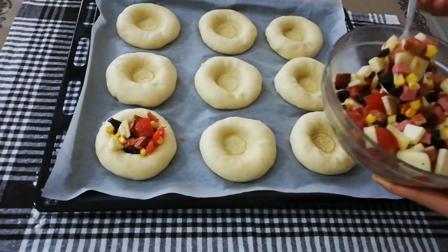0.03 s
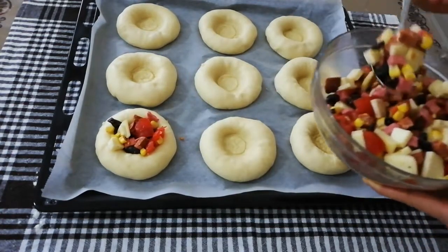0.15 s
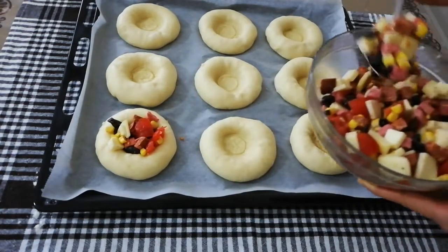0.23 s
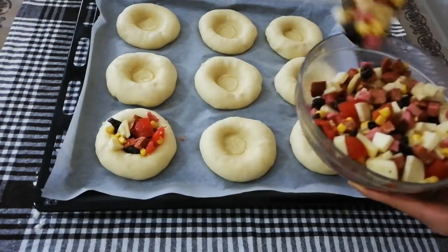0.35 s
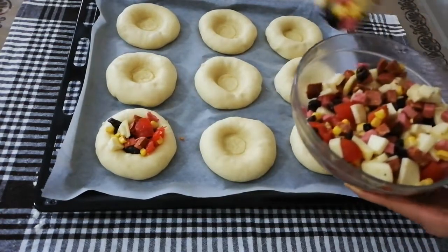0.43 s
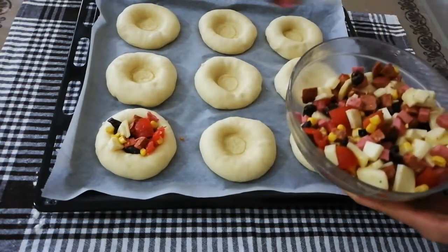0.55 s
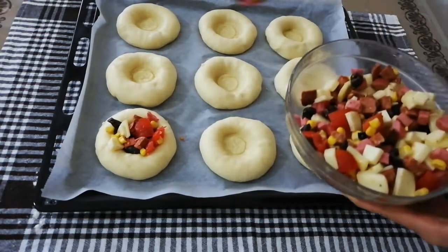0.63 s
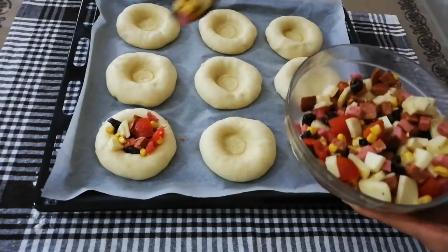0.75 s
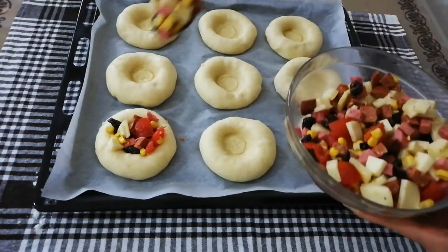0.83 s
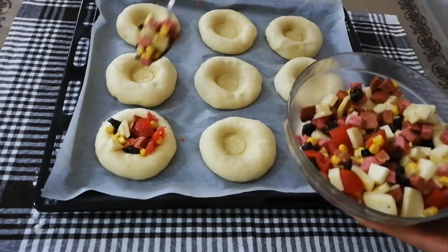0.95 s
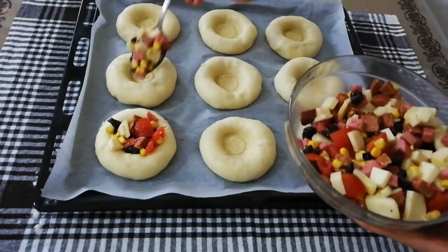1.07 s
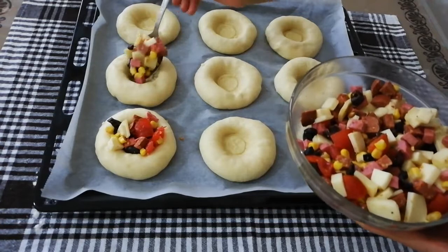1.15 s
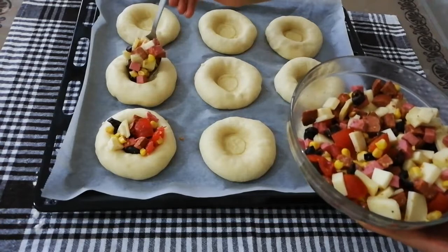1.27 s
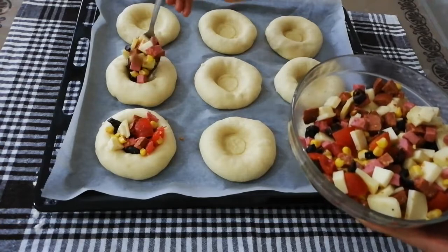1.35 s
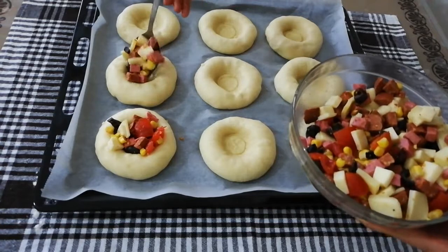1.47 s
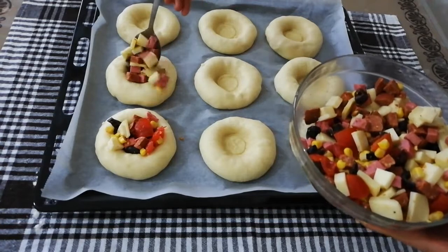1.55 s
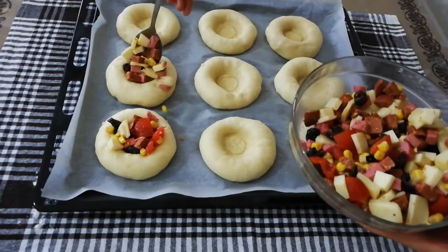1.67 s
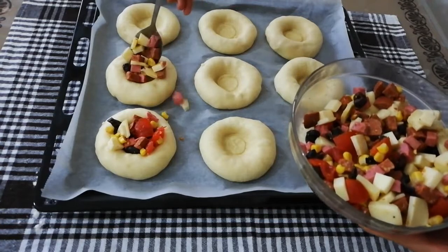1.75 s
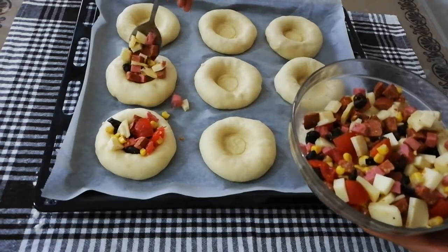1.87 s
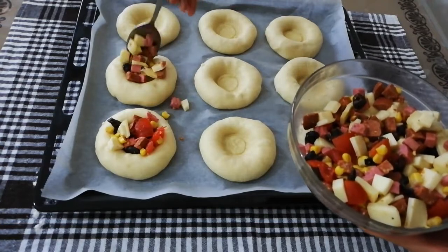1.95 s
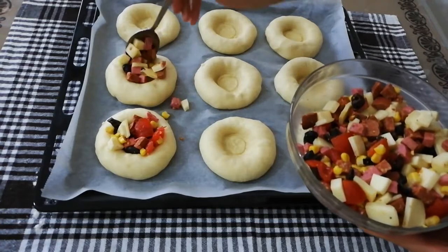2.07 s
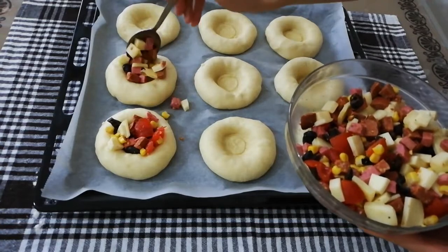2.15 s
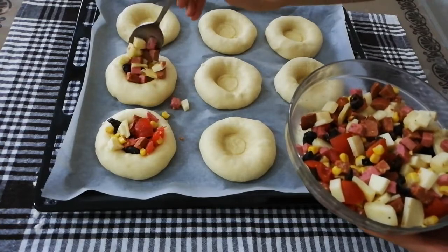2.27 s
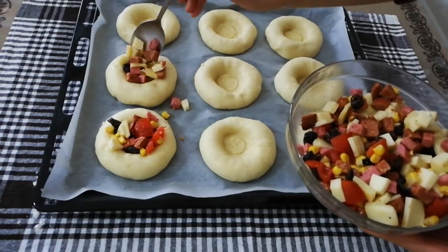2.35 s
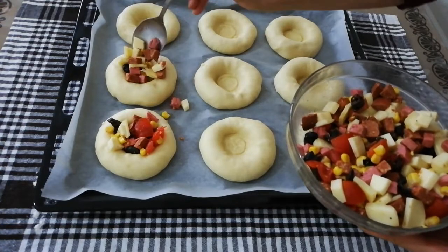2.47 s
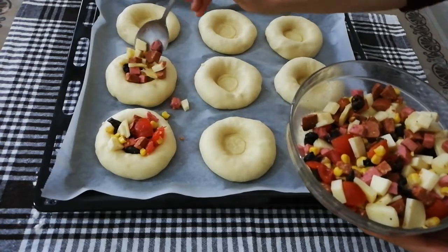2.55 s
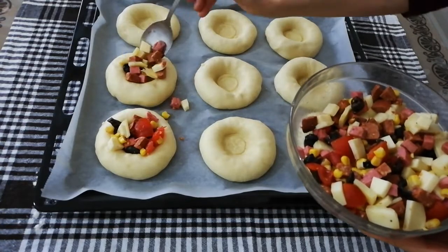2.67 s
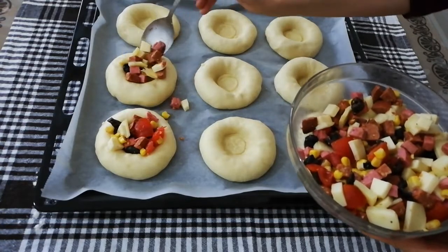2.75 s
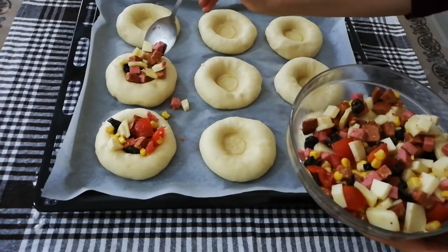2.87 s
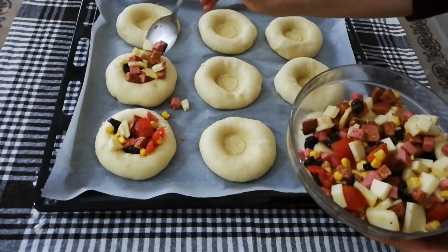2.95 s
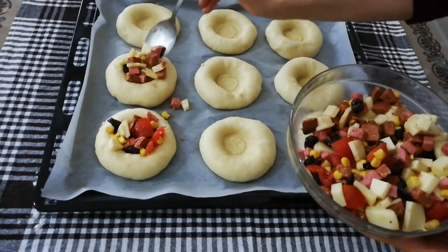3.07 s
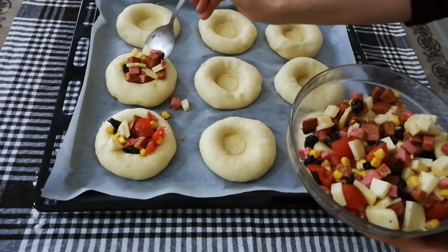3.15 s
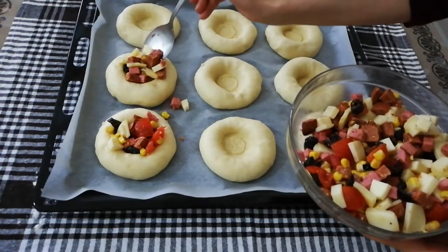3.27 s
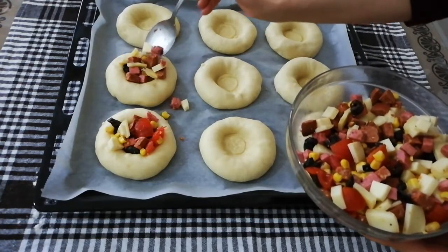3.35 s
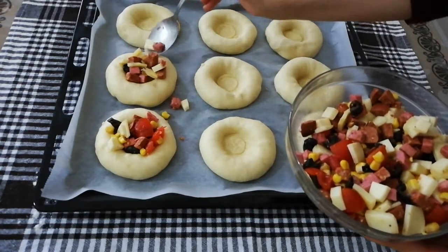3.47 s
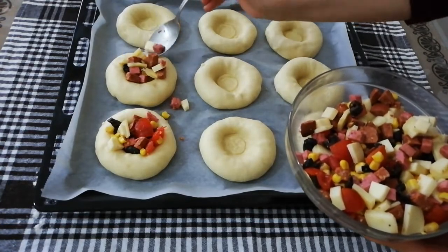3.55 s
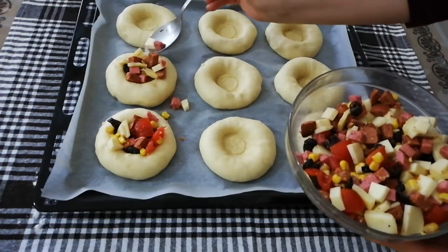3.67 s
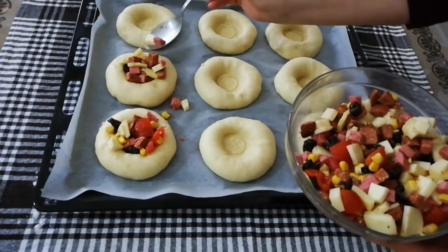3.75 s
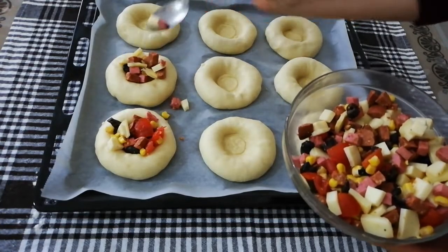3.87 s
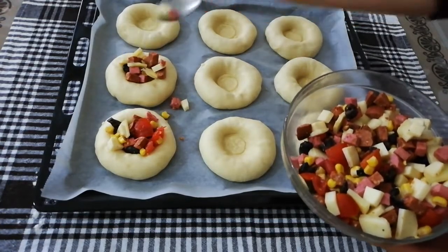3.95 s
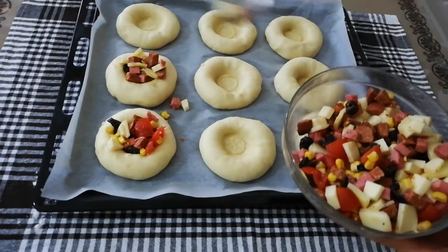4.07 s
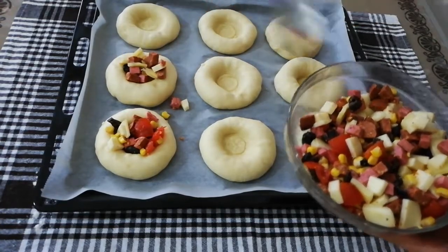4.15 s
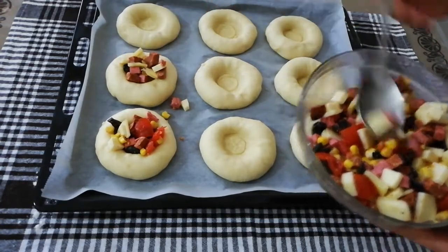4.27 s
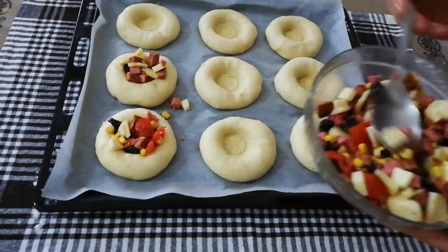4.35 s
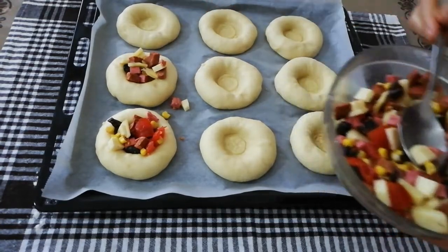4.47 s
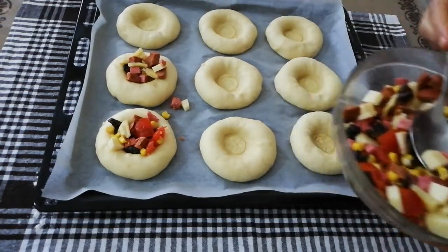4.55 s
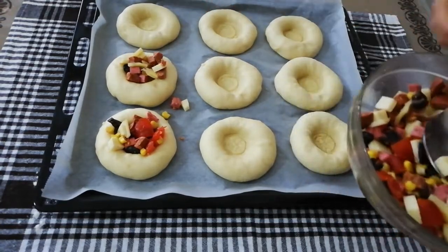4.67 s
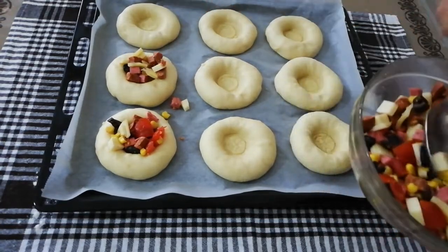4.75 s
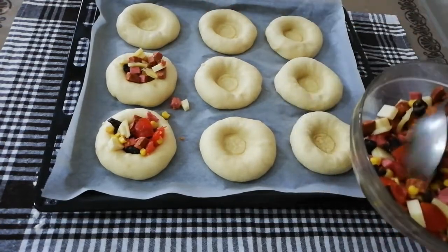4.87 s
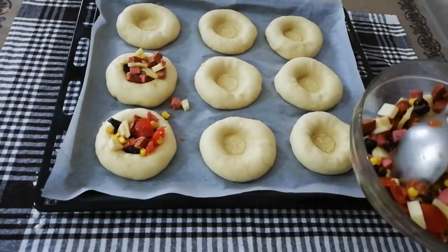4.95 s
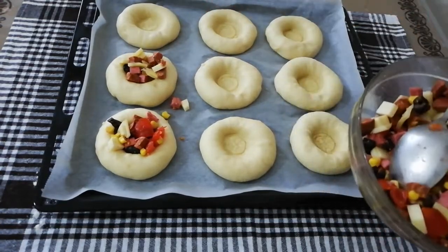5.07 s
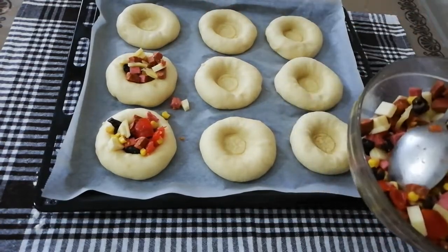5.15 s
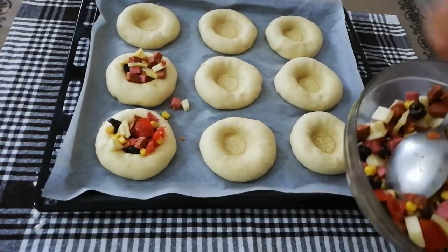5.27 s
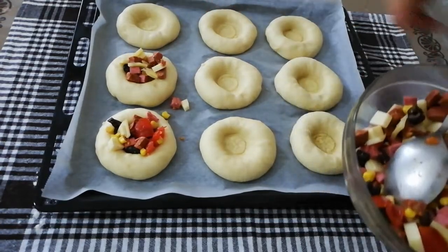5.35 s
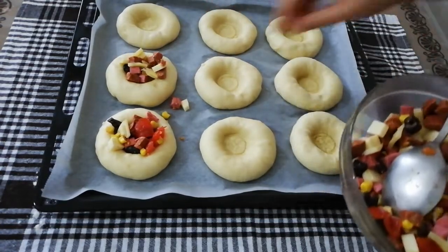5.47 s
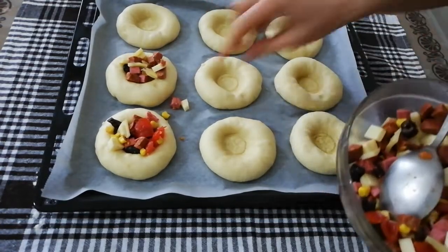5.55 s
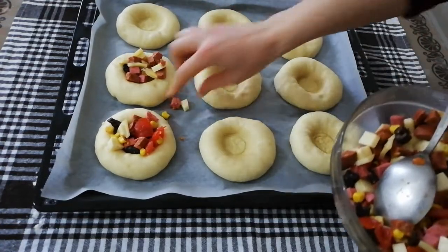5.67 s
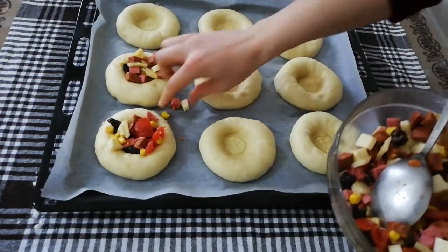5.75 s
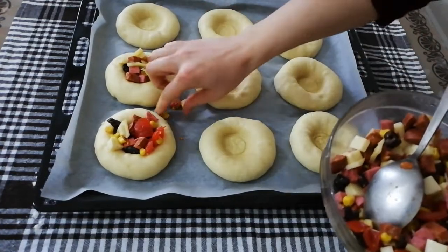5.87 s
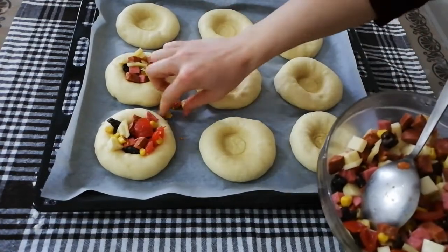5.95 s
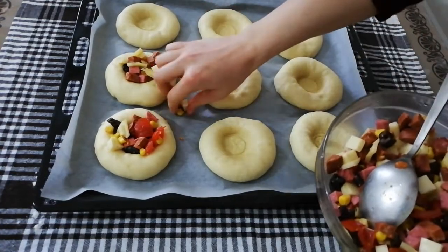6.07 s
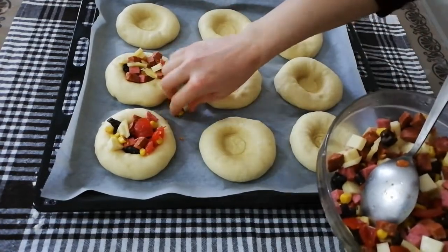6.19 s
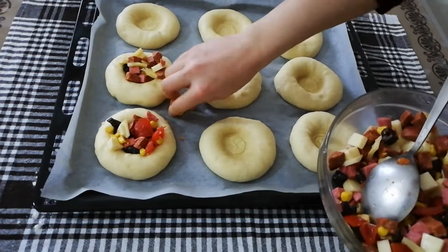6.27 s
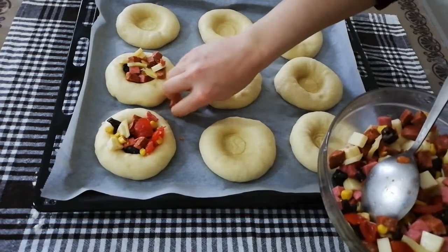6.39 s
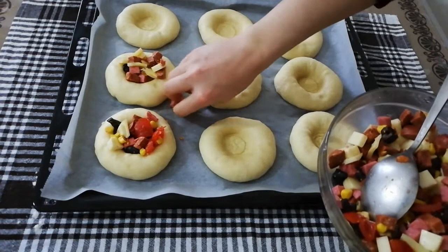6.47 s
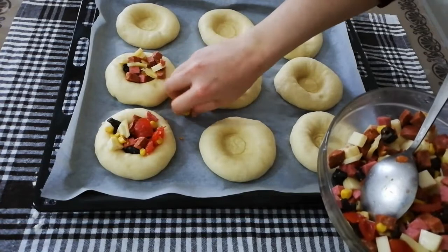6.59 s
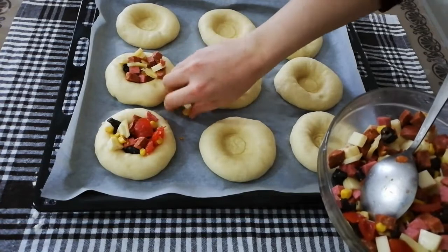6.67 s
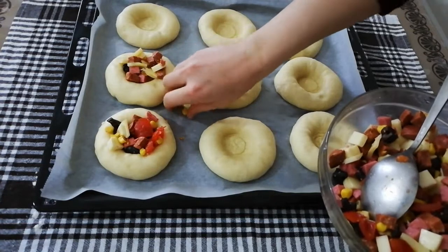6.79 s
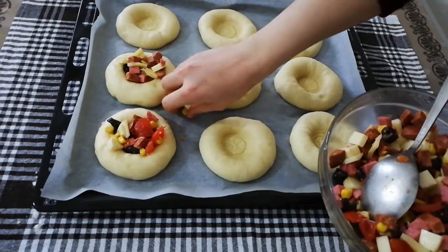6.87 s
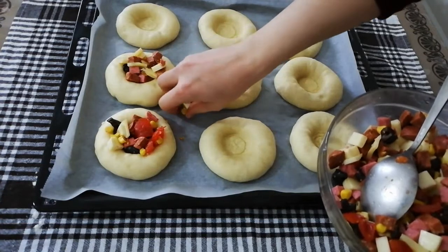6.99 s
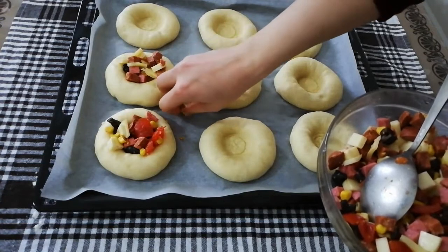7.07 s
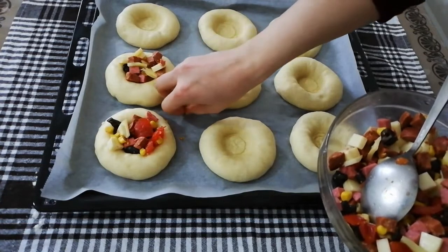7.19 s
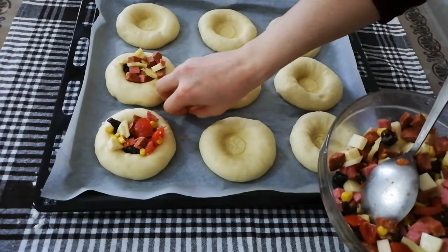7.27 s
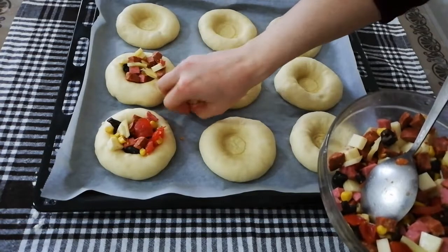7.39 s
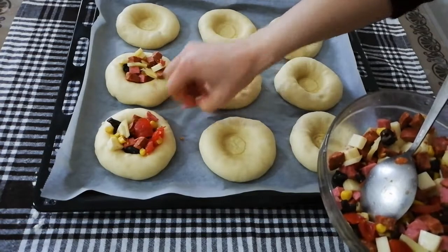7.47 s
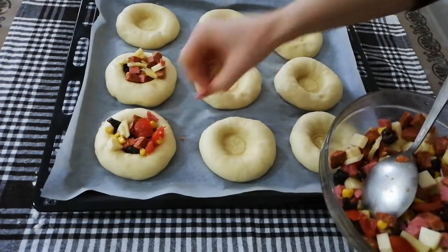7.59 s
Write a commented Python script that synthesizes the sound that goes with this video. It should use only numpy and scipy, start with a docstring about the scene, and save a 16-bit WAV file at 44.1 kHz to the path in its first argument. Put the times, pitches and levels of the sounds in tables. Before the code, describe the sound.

A quiet, hard-walled kitchen with low appliance hum and soft hiss. Diced filling drops on a paper-lined tray in two quick clusters of crisp snaps. Later a metal spoon clinks on a glass bowl, then rattles again as it is laid on the rim. Finally fingers pick stray pieces off the paper with small crackles and faint grainy hisses. A close stereo microphone catches short room echoes.

```python
"""In a quiet kitchen an appliance hums, and faint far chirps, narrow bands of noise, come now and then.
Diced food drops from a glass bowl on a tray lined with baking paper: short noise bursts that snap and thud.
The bowl bumps softly as it is shifted; a metal spoon clinks twice on it, damped modes under a clatter of noise.
Last, fingers pick stray pieces off the paper with snaps and grainy hisses, and a thin far whine swells once.
The hard room answers bowl and paper with echoes and a diffuse tail."""
import sys
import numpy as np
from scipy import signal
from scipy.fft import rfft, irfft
from scipy.io import wavfile
from scipy.ndimage import uniform_filter1d

SR = 44100
rng = np.random.default_rng(int(sys.argv[2]) if len(sys.argv) > 2 else 0)


def bounce(signal):
    """Save signal as a 16-bit WAV file at the path given by the first command-line argument."""
    frames = np.transpose(np.atleast_2d(signal))
    limited = np.clip(frames, -1, 1)
    pcm = np.round(limited * 32767).astype(np.int16)
    wavfile.write(sys.argv[1], SR, pcm)


N = 336483

# Modes of spoon and bowl together. Each row: frequency in Hz, 60 dB decay time in s, level in dB when the
# spoon strikes the wall, level in dB when it is laid on the rim, left-right difference in dB.
BOWL_MODES = [(827, 0.041, -40.5, -34.5, -23), (963, 0.037, -39.5, -31, -10),
              (1118, 0.036, -37.5, -54, -14), (1633, 0.064, -29.5, -30.5, -1),
              (1744, 0.038, -39.5, -27.5, -3), (2198, 0.077, -66, -30, 1), (2445, 0.068, -37, -40, -8),
              (2854, 0.077, -28, -32, -2.5), (3190, 0.042, -26, -33.5, -20), (3350, 0.045, -33.5, -41, -18),
              (3545, 0.042, -32, -44, 3), (4114, 0.12, -37, -27.5, 3), (4290, 0.11, -38, -22.5, 2),
              (4333, 0.043, -25, -36, -17), (5000, 0.1, -44, -48.5, 10), (5430, 0.046, -50, -41, -9),
              (5920, 0.12, -38, -39, 7), (6580, 0.15, -52, -40, -3), (7580, 0.036, -26.5, -38, -3),
              (7807, 0.064, -26.5, -29.5, -2), (8700, .06, -31.5, -57, -3), (8760, 0.072, -45, -32, -18),
              (9750, 0.078, -30, -22.5, 15), (10100, .06, -34, -37, -1), (10400, .05, -40, -34, 8),
              (11080, .06, -32, -37.5, 6), (10760, .05, -33, -44, 22), (11940, 0.051, -29, -36.5, -7),
              (12500, 0.054, -25, -47.5, -21), (12860, 0.049, -27, -57.5, -19), (13720, .1, -58, -55, -1)]
# Spoon on glass. Each row: start in s, gain of the ring in dB, clatter level in dB, clatter decay time in s,
# place of contact from 0 (wall) to 1 (rim).
CLINKS = [(4.5921, 0, -29, 0.043, 0.014), (5.0682, 2, -25.5, 0.07, 0.82)]
# Spectrum of a clink's dense rattle. Each row: frequency in Hz, relative density in dB per Hz.
CLATTER_SPECTRUM = [(100, -28), (350, -7), (560, -18), (900, 3), (1250, -16), (1650, 2), (2100, -3),
                    (3000, -4), (4500, 8.5), (6500, -9), (7700, 3), (11000, 4.5), (13000, 6.5),
                    (15000, -32)]
# Direction of that rattle. Each row: frequency in Hz, left-right difference in dB.
CLATTER_SIDE = [(300, -3), (900, -2), (1600, 17), (3300, -12), (7500, 0), (10500, 5), (12800, -1)]
MODE_RISE_S, CLATTER_RISE_S = .0004, 0.00022

# Paper snapping under food and fingertips. Each row: start in s, level in dB, thud relative to the snap in dB,
# brightness in dB per octave.
SNAPS = [(1.6448, -25.5, -22, 1.5), (1.651, -27.5, -31, -3), (1.6530, -28.5, -24, -3),
         (1.7443, -32.5, -13, 5), (1.7462, -27, -10, 6), (1.7484, -21.5, -17, 12), (1.887, -42.5, -14, 7),
         (1.893, -36.5, -19, 4), (5.985, -52.5, -22, -4), (6.053, -53, -10, 1), (6.0900, -32, -27, 3.5),
         (6.121, -48, -20, 6), (6.228, -49, -16, 0), (6.2414, -50.5, -4, -6), (6.541, -49, 0, 1),
         (7.346, -58, 8.5, -10)]
# Spectrum of a snap before brightening. Each row: frequency in Hz, relative density in dB per Hz.
PAPER_SPECTRUM = [(800, -41), (2000, -38), (3000, -10), (4400, -8), (5600, -3), (7300, 0.5), (8600, 1.5),
                  (10200, 3), (11600, 2), (13200, -11), (15500, -22)]
# Spectrum of a piece's thud. Each row: frequency in Hz, relative density in dB per Hz.
THUD_SPECTRUM = [(100, -8), (600, -14), (1400, 0.5), (3000, 2.5), (5000, 2.5), (9000, -20)]
BRIGHTNESS_PIVOT_HZ = 8000
# decay time at SNAP_HARD_DB, and the fall in level that doubles it
SNAP_T60_S, SNAP_HARD_DB, SNAP_DOUBLING_DB = 0.0079, -26, 33
SNAP_SIDE_DB = 3  # left-right: the tray lies a little to the left

# Fingers sliding on the paper. Each row: middle in s, half length in s, level in dB.
RUBS = [(6.0, 0.028, -67), (6.25, .14, -77), (6.489, .027, -53), (6.54, 0.071, -78), (7.04, .095, -72),
        (7.25, .065, -75)]
# Spectrum of a stroke. Each row: multiple of the pitch, relative density in dB.
RUB_SPECTRUM = [(.2, -31), (.6, -16), (.83, -8), (.92, 3), (1, 5), (1.08, 0), (1.22, -9), (1.5, -28)]
RUB_HZ = 10170  # one pitch for every stroke

# Soft low bumps as the bowl is shifted. Each row: middle in s, level in dB.
BUMPS = [(3.74, -64), (4.3, -69), (4.85, -66)]
# Spectrum of a bump. Each row: multiple of the pitch, relative density in dB.
BUMP_SPECTRUM = [(.3, -13), (1, 4), (1.6, -8), (3, -30), (10, -70)]
BUMP_HALF_S, BUMP_HZ = .07, 35

# Faint, far, airy chirps. Each row: middle in s, pitch in Hz.
CHIRPS = [(.63, 3000), (2.12, 3200), (2.6, 2950), (3.48, 3380), (7.43, 3300)]
# Spectrum of a chirp. Each row: multiple of the pitch, relative density in dB.
CHIRP_SPECTRUM = [(.6, -47), (.85, -8), (1, -4), (1.15, -11), (1.6, -38)]
CHIRP_HALF_S, CHIRP_DB = .066, -72
# Spectrum of the far whine. Each row: multiple of the pitch, relative density in dB.
WHINE_SPECTRUM = [(.9, -60), (.98, -14), (1, 0), (1.02, -14), (1.1, -60)]
WHINE_MIDDLE_S, WHINE_HALF_S, WHINE_DB, WHINE_HZ = 7.13, .2, -78, 1245

# Lines of the appliance. Each row: frequency in Hz, mean level in dB rms.
HUM_LINES = [(48.4, -74.5), (145.2, -70.5), (193.6, -77), (290.4, -78), (339, -86), (403.7, -83),
             (678, -90), (8301, -90)]
# Spectrum of room air and microphone hiss. Each row: frequency in Hz, relative density in dB per Hz.
AIR_SPECTRUM = [(20, -6), (45, -4.5), (65, -8.5), (130, -6.5), (260, -7), (380, -9.5), (520, -17.5),
                (850, -16.5), (1350, -15.5), (2200, -21), (4400, -20.5), (6500, -24), (11000, -23.5),
                (15500, -30.5)]
AIR_DB = -64
# Likeness of left and right air noise, limited to 0..1 in use. Each row: frequency in Hz, likeness.
AIR_LIKENESS = [(60, 0.9), (150, 0.86), (380, -0.14), (950, -3.07), (2380, 0), (5980, -0.47),
                (15000, -0.06)]

# Reverberation of the room. Each row: frequency in Hz, 60 dB decay time in s.
ROOM_T60 = [(200, 0.43), (1500, 0.47), (4200, 0.41), (8000, 0.36), (12000, 0.26), (16000, 0.16)]
# Treble response of the microphone. Each row: frequency in Hz, gain in dB.
MICROPHONE = [(1000, 0), (11000, 1), (13000, -0.5), (14200, -1), (15500, 0.5)]
EDGE_HZ = 15900  # upper band limit of the recorder
# time by which the left microphone hears late, and how far that varies from tone to tone
PORT_LAG_S, PORT_SCATTER_S = .0001, .00006


def clinks():
    """Modal excitation: the place of contact sets each mode's level; a dense clatter fills the first moments."""
    out, t = np.zeros((2, N)), np.arange(2 ** 13) / SR
    clatter_side_db = read(CLATTER_SIDE, np.fft.rfftfreq(len(t), 1 / SR))
    for start, ring_db, clatter_db, clatter_t60, place in CLINKS:
        for hz, t60, wall_db, rim_db, side_db in BOWL_MODES:
            mode_db = ring_db + np.interp(place, [0, 1], [wall_db, rim_db])
            tone = ring(hz, blow(t, t60, rise=MODE_RISE_S), chatter=0.31)
            add(out, start, amp(mode_db) * pan(side_db) * tone)
        rattle = noise(CLATTER_SPECTRUM, len(t), side_db=clatter_side_db)
        add(out, start, amp(clatter_db) * rattle * blow(t, clatter_t60, rise=CLATTER_RISE_S))
    return out


def ring(hz, envelope, chatter):
    """Damped mode modulated by contact noise: the chattering spoon roughens it without adding energy."""
    t = np.arange(len(envelope)) / SR
    rattle = unit(uniform_filter1d(rng.standard_normal((2, len(t))), size=140))
    shake = 1 + chatter * (rattle[0] + 1j * rattle[1])  # changes both amplitude and phase
    carrier = at_ports(hz)[:, None] * np.exp(2j * np.pi * hz * t)
    wave = envelope * (shake * carrier).real
    return unit(wave) * np.sqrt(np.mean(envelope ** 2) / 2)


def snaps():
    """Buckling of stiff paper: the harder the snap, the quicker its decay; the piece adds a duller thud."""
    out, t = np.zeros((2, N)), np.arange(2 ** 10) / SR
    for start, db, thud_db, bright_db in SNAPS:
        t60 = SNAP_T60_S * 2 ** ((SNAP_HARD_DB - db) / SNAP_DOUBLING_DB)
        spectrum = [(hz, level + bright_db * np.log2(hz / BRIGHTNESS_PIVOT_HZ)) for hz, level in PAPER_SPECTRUM]
        crack = noise(spectrum, len(t)) * blow(t, t60, rise=0.00013)
        thud = amp(thud_db) * noise(THUD_SPECTRUM, len(t)) * blow(t, 0.01, rise=0.00039)
        add(out, start, amp(db) * pan(SNAP_SIDE_DB) * (crack + thud))
    return out


def rubs():
    """Sliding friction: each stroke of the fingers draws a grainy hiss from the paper."""
    strokes = [(middle, half, db, RUB_HZ) for middle, half, db in RUBS]
    return swells(strokes, RUB_SPECTRUM, grain_db=2, side_db=6)


def bumps():
    """Low-frequency impact: every shift of the bowl gives a like soft bump, stronger or weaker."""
    return swells([(middle, BUMP_HALF_S, db, BUMP_HZ) for middle, db in BUMPS], BUMP_SPECTRUM)


def far_sounds():
    """Narrow-band noise: equally long and loud chirps vary slightly in pitch; a thin whine swells once."""
    chirp_rows = [(middle, CHIRP_HALF_S, CHIRP_DB, hz) for middle, hz in CHIRPS]
    whine_rows = [(WHINE_MIDDLE_S, WHINE_HALF_S, WHINE_DB, WHINE_HZ)]
    return swells(chirp_rows, CHIRP_SPECTRUM) + swells(whine_rows, WHINE_SPECTRUM)


def swells(rows, spectrum, grain_db=0, side_db=0):
    """Gaussian envelopes on bands of noise; grain_db roughens them with the tiny catches of friction."""
    out = np.zeros((2, N))
    for middle, half, db, hz in rows:
        t = np.arange(-2 * half, 2 * half, 1 / SR)
        catches = unit(uniform_filter1d(rng.standard_normal(len(t)), size=40))
        band = unit(amp(grain_db * catches) * noise(spectrum, len(t), hz))
        envelope = np.exp(-(t / half) ** 2)
        add(out, middle + t[0], amp(db) * pan(side_db) * envelope * band)
    return out


def hum():
    """Line spectrum of a motor: steady tones that waver slightly in level and phase."""
    t = np.arange(N) / SR
    lines = np.zeros(N)
    for hz, db in HUM_LINES:
        level = amp(db + 1.7 * drift(rate=4.1))
        lines += level * np.sin(2 * np.pi * hz * t + 0.37 * drift(rate=3.0))
    return np.sqrt(2) * lines  # peak amplitude from rms


def drift(rate):
    """Superposition of 16 slow sines of random phase, up to rate in Hz: a wander of rms 1."""
    t = np.arange(0, N, 256)
    waves = sum(np.sin(2 * np.pi * (f * t / SR + rng.random())) for f in rng.uniform(0, rate, size=16))
    return np.interp(np.arange(N), t, unit(waves))


def air():
    """Partial coherence: steady noise alike on both sides in the bass and unrelated in most of the treble."""
    hz = np.fft.rfftfreq(N, 1 / SR)
    left, other = rfft(rng.standard_normal((2, N)))
    same = np.clip(read(AIR_LIKENESS, hz), 0, 1)
    right = same * left + np.sqrt(1 - same ** 2) * other
    return amp(AIR_DB) * unit(irfft(np.array([left, right]) * amp(read(AIR_SPECTRUM, hz)), N))


def kitchen(x, wet_db, early_db, gap, treble_db):
    """Room response: a few early echoes after gap seconds, then a diffuse tail that dies faster in the treble."""
    size = 2 ** 15
    taps = rng.standard_normal((2, size)) * (rng.random((2, size)) < .15)
    hz, t, bands = signal.stft(taps, SR, nperseg=256)
    decay = amp(-60 * t / read(ROOM_T60, hz)[:, None])
    tail = signal.istft(bands * decay, SR, nperseg=256)[1][:, :size]
    fade_in = np.clip(np.arange(size) / (gap * SR) - 1, 0, 1)
    tail = amp(wet_db) * unit(tail * fade_in) / np.sqrt(size)
    delays = gap + rng.uniform(0, 0.015, size=(2, 8))
    for side in (0, 1):
        tail[side, (delays[side] * SR).astype(int)] += amp(early_db) * rng.choice([-1, 1], size=8)
    # a straight tilt that reaches treble_db at EDGE_HZ
    tail = irfft(rfft(tail) * amp(treble_db * np.fft.rfftfreq(size, 1 / SR) / EDGE_HZ))
    # the walls mix what went left with what went right
    spread = np.array([x[0] + x[1], x[1] - x[0]]) / np.sqrt(2)
    return x + signal.fftconvolve(spread, tail, axes=1)[:, :N]


def at_ports(hz):
    """Interaural-type delay: random-phase tones at two microphones, alike in the bass, scattered in the treble."""
    start, scatter = np.exp(2j * np.pi * rng.random(np.shape(hz))), rng.standard_normal(np.shape(hz))
    lag = PORT_LAG_S + PORT_SCATTER_S * scatter
    return np.array([start * np.exp(-2j * np.pi * hz * lag), start])


def noise(spectrum, size, pitch=1, side_db=0):
    """Spectral synthesis: stereo noise of random phase, its spectrum stretched by pitch, scaled to rms 1."""
    hz = np.fft.rfftfreq(size, 1 / SR)
    bins = at_ports(hz) * amp(read(spectrum, hz / pitch)) * pan(side_db)
    return unit(irfft(bins, size))


def blow(t, t60, rise):
    """Impulse envelope: a quick rise and an exponential decay, 60 dB in t60 seconds."""
    return (1 - np.exp(-t / rise)) * amp(-60 * t / t60)


def pan(side_db):
    """Intensity stereo: left and right gains of constant total power."""
    gains = amp(np.array([[.5], [-.5]]) * side_db)
    return gains / np.sqrt(np.mean(gains ** 2, axis=0))


def add(mix, s, sound):
    """Superposition: mixes a stereo sound in at time s, in seconds."""
    part = mix[:, round(s * SR):][:, :sound.shape[1]]
    part += sound[:, :part.shape[1]]


def read(points, hz):
    """Logarithmic pitch scale: joins points by straight lines over log frequency."""
    f, value = np.transpose(points)
    return np.interp(np.log(hz + 1e-6), np.log(f), value)


def amp(db):
    """Level law: decibels to amplitude gain."""
    return 10 ** (np.asarray(db) / 20)


def unit(x):
    """Mean power: scales to rms 1."""
    return x / np.sqrt(np.mean(x ** 2) + 1e-20)


def scene():
    """Superposition of bowl and paper in the room with bumps, far sounds and steady background."""
    bowl = kitchen(clinks(), wet_db=-10.5, early_db=-29, gap=.008, treble_db=-3)
    paper = kitchen(snaps() + rubs(), wet_db=-3.0, early_db=-13.0, gap=.006, treble_db=-15.5)
    return bowl + paper + bumps() + far_sounds() + hum() + air()


def record(dry):
    """Linear filtering: the microphone's slight treble colour, then the recorder's band limit."""
    response = amp(read(MICROPHONE, np.fft.rfftfreq(N, 1 / SR)))
    heard = irfft(rfft(dry) * response, N)
    band_limit = signal.firwin(511, EDGE_HZ, window=("kaiser", 9), fs=SR)
    return signal.oaconvolve(heard, band_limit[None], "same")


dry = scene()
out = record(dry)
bounce(out)
```